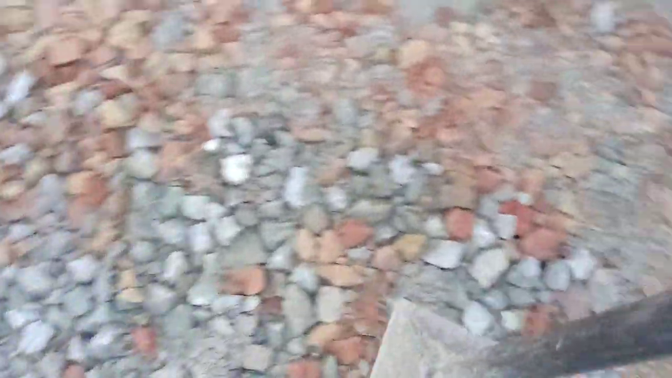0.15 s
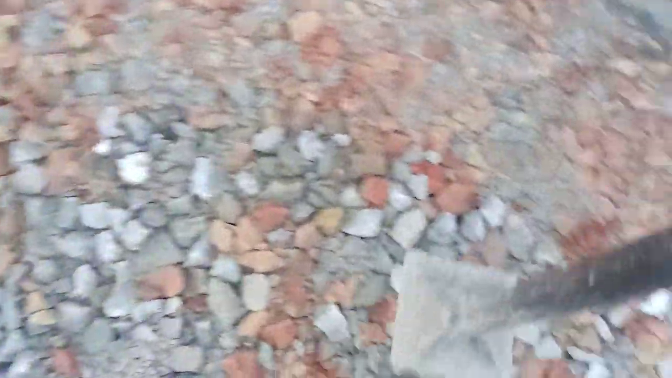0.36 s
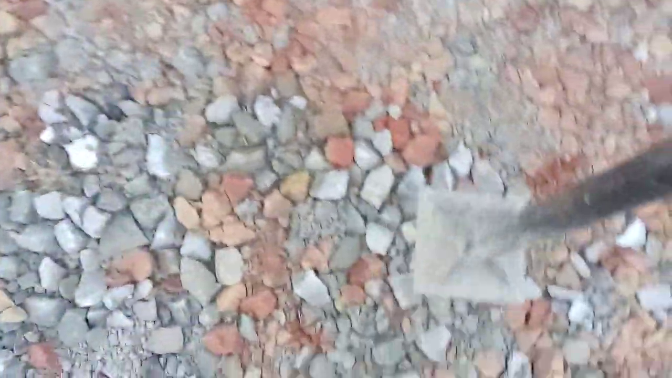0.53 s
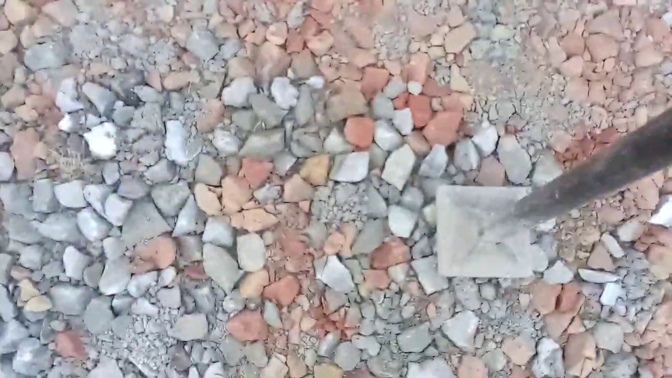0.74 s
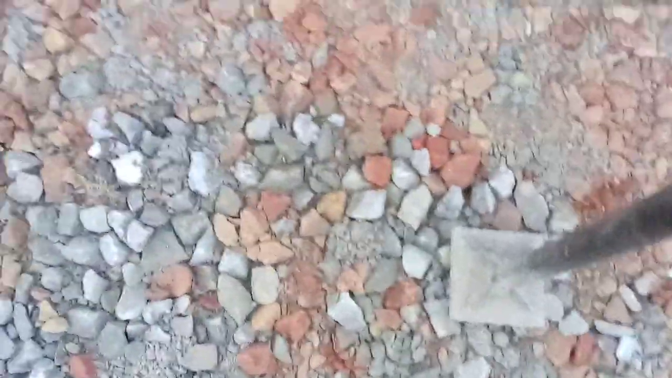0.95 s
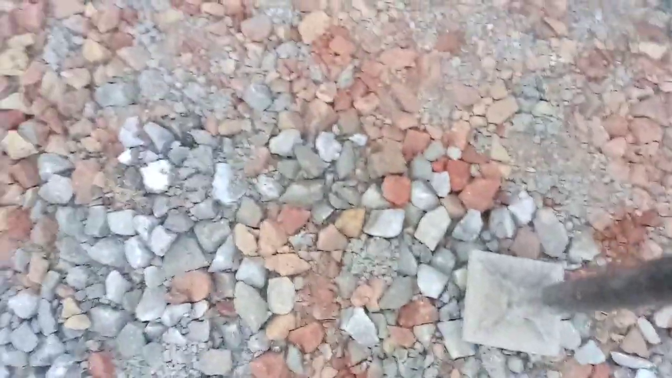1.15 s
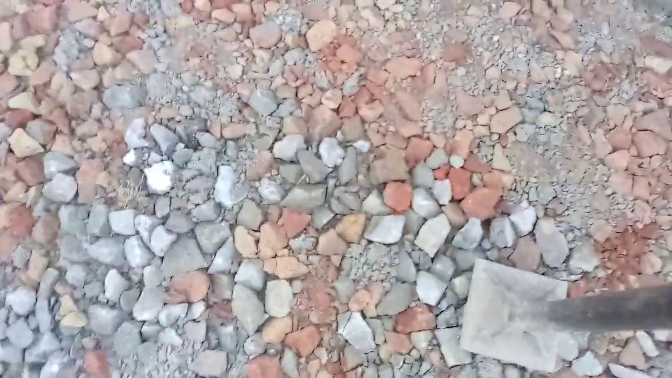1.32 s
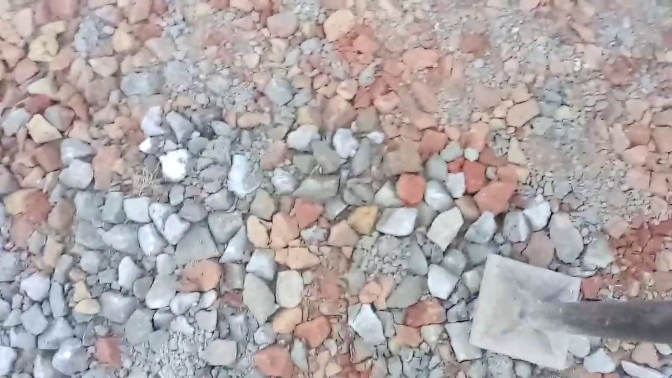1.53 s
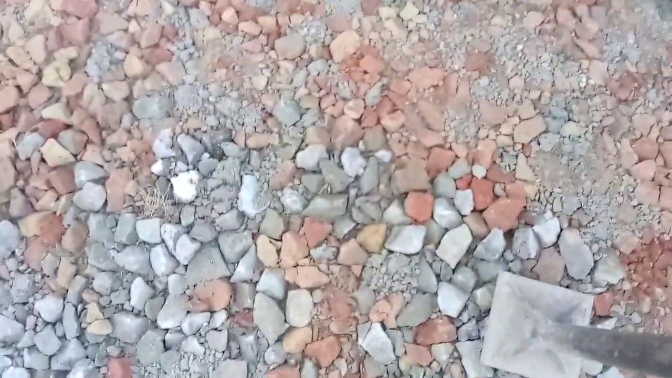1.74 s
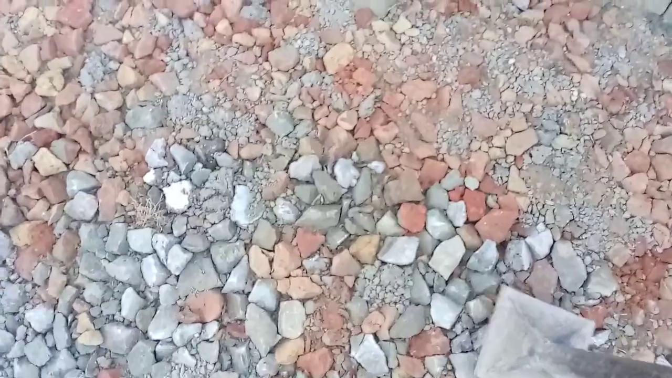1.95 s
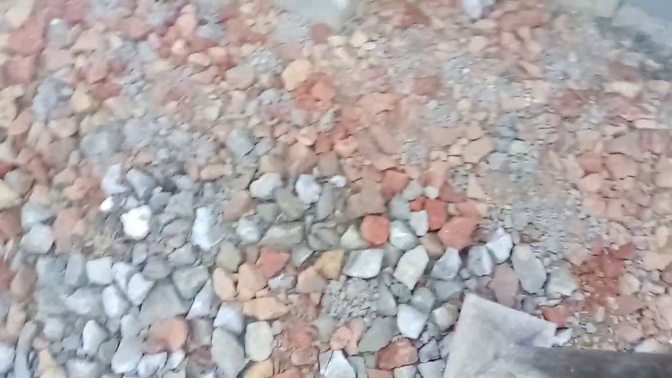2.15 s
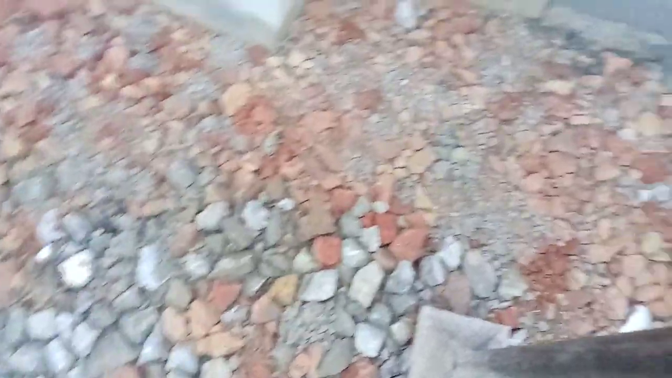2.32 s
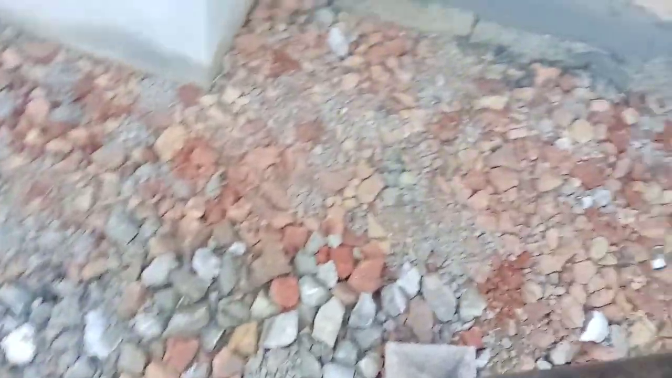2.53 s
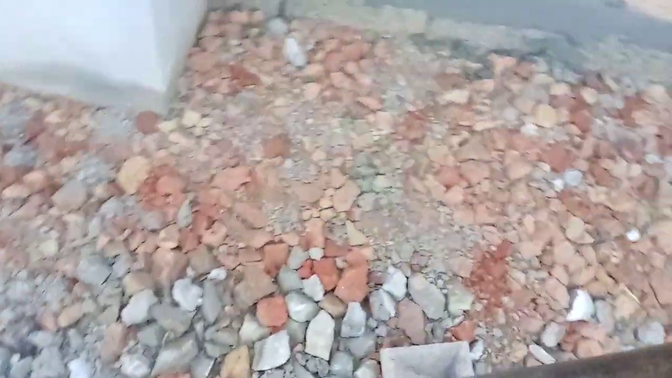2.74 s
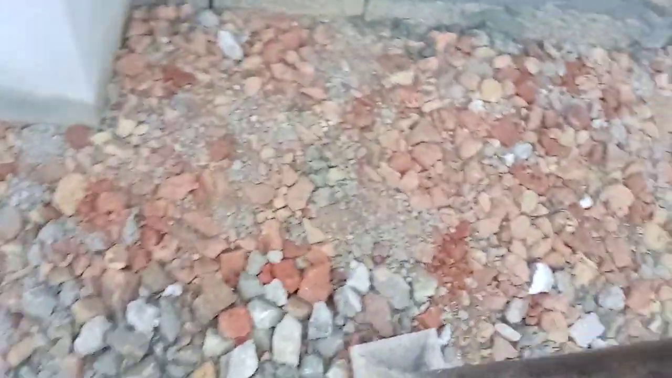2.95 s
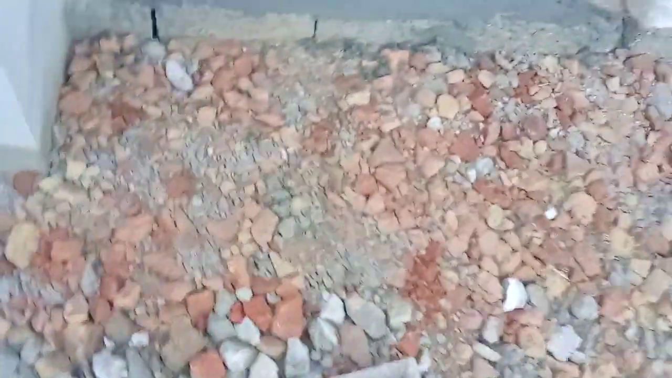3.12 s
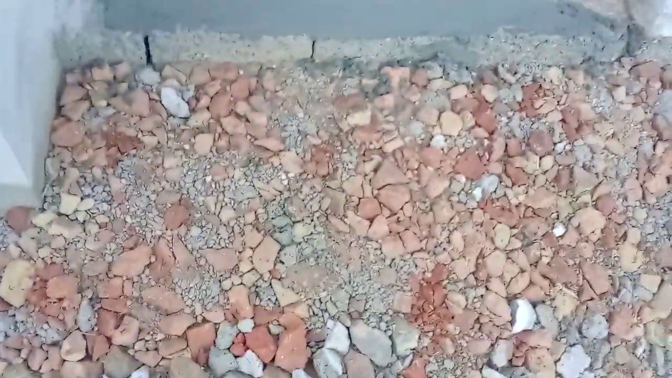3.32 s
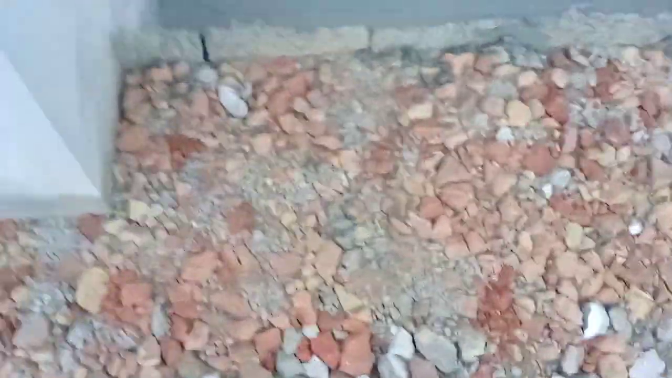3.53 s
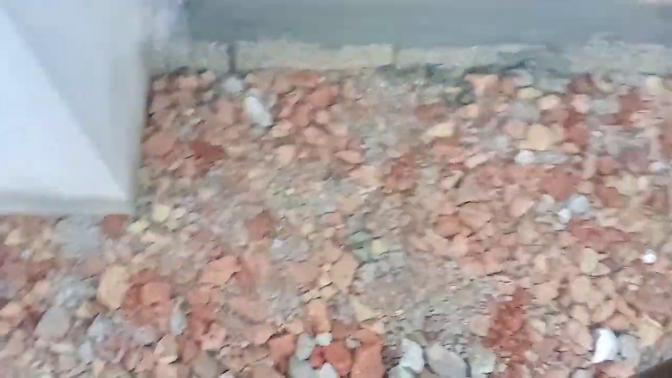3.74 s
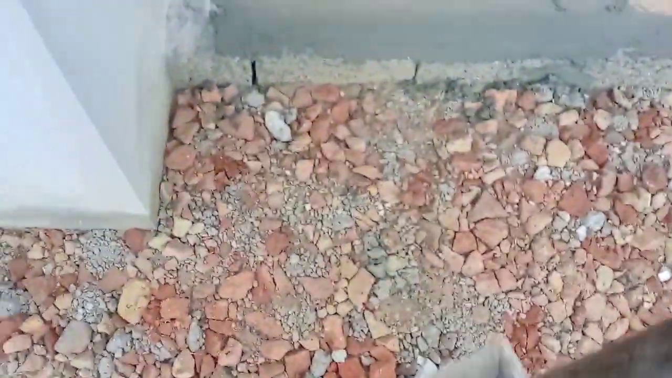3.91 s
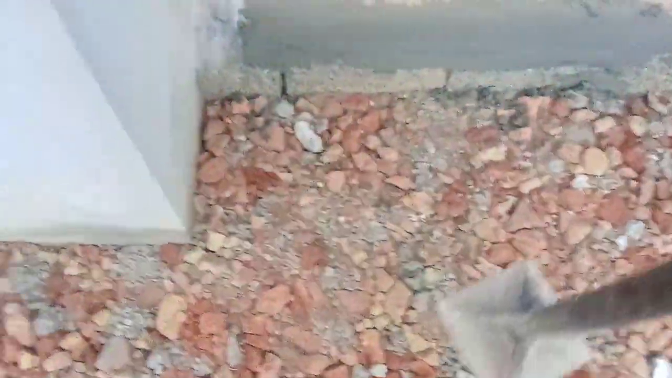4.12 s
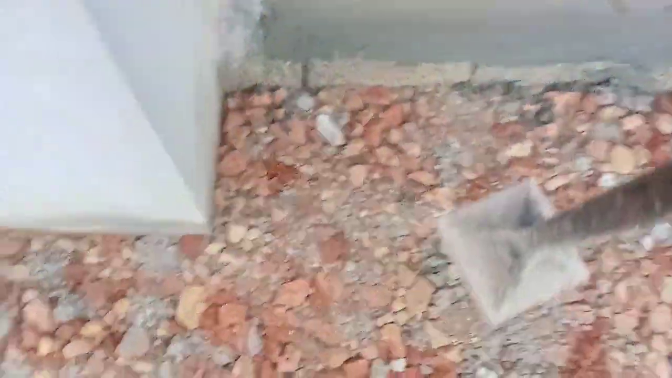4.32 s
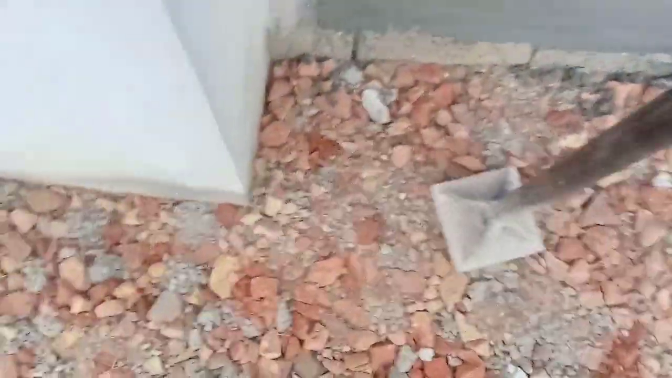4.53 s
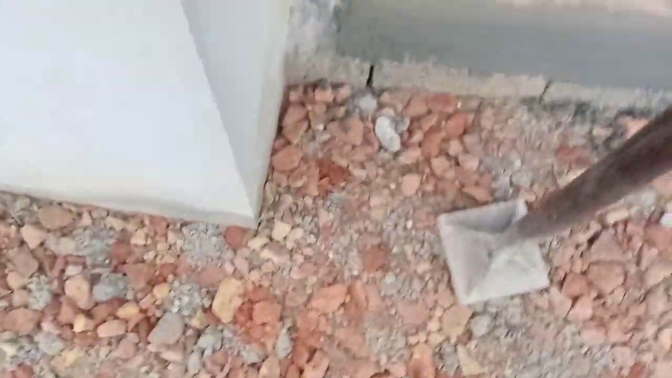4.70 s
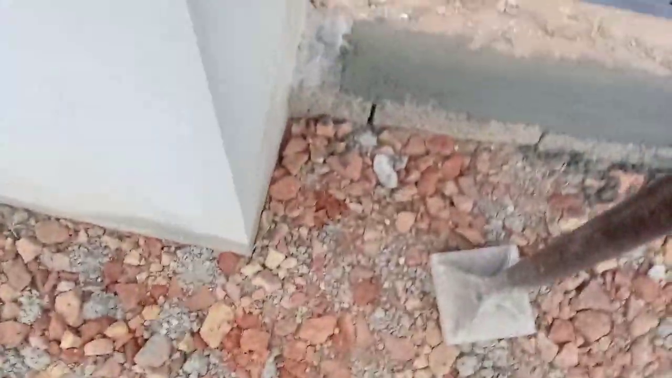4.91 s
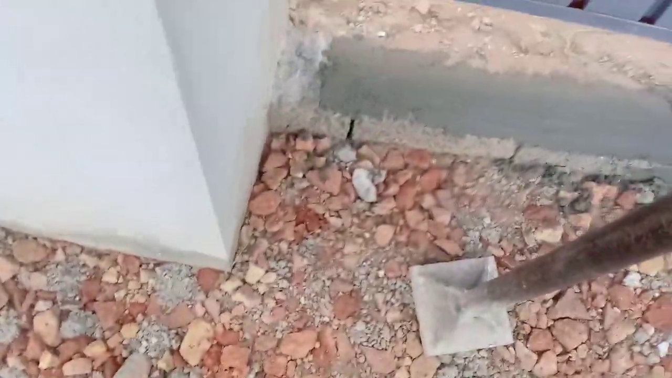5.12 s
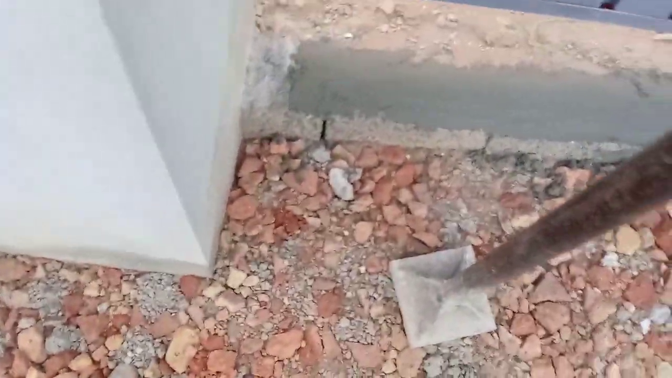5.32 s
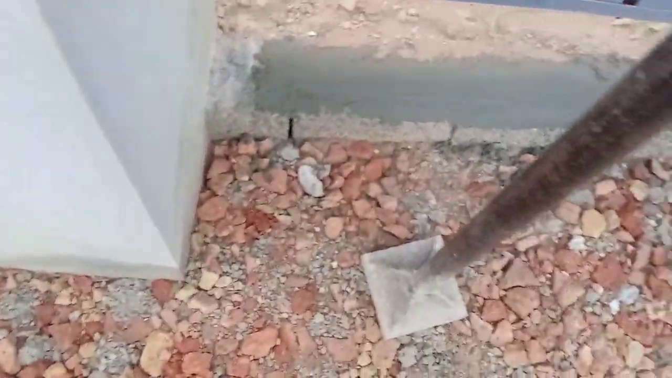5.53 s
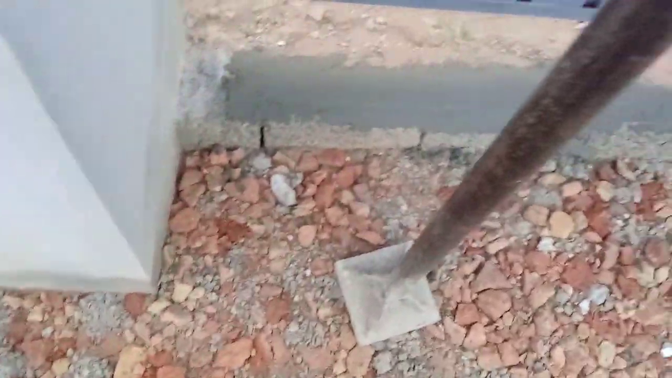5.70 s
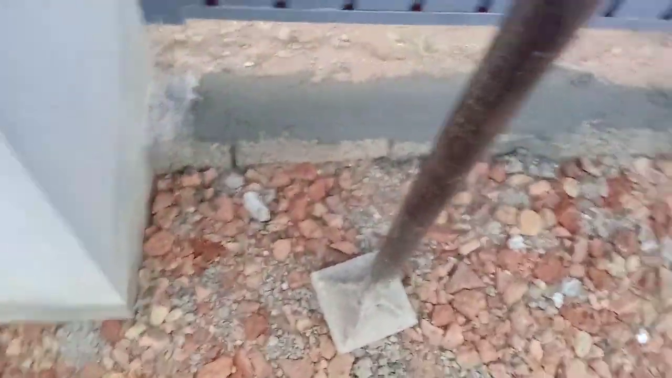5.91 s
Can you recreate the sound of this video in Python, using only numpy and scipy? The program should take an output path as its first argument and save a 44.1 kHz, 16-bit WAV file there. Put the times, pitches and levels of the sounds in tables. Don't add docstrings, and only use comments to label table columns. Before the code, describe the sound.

A steel hand tamper hits broken brick twice, a glancing clank then a hard ringing crack, with stones rattling and an engine knocking nearby.

```python
import sys
import numpy as np
from scipy import signal
from scipy.fft import rfft, irfft, next_fast_len
from scipy.io import wavfile

SR = 44100
rng = np.random.default_rng(int(sys.argv[2]) if len(sys.argv) > 2 else 0)


def nominal_scale(level):
    x = np.asarray(level, float) / 20
    return 10 ** x


def wav_out(sig):
    wavfile.write(sys.argv[1], SR, np.round(np.clip(np.atleast_2d(sig).T, -1, 1) * 32767).astype(np.int16))


N = 267318

# time in seconds, level in dB.
RUMBLE_LEVEL = [(0.0, -57.5), (0.5, -59), (1.0, -47.5), (1.5, -58.5), (1.9, -52), (2.1, -57), (2.6, -58.5),
                (3.24, -57.5), (3.5, -51.5), (4.3, -53), (4.67, -38), (4.91, -47.5), (5.3, -43),
                (5.89, -58), (6.06, -66)]
# frequency in Hz, density in dB per Hz.
RUMBLE_SPECTRUM = [(15, -68), (25, -31), (38, -39), (76, 6.5), (140, 4), (168, -11.5), (246, -24),
                   (300, -12.5), (390, -46), (660, -120)]
AIR_SPECTRUM = [(150, -20.5), (200, 3), (300, -14.5), (600, -17), (1100, -9.5), (1700, -21), (3000, -17),
                (6100, -18), (6800, -25.5), (9500, -34), (13500, -32.5), (15100, -21), (15700, -33),
                (16200, -68)]
# start in seconds, casing ring in dB, dull part in dB, bright part in dB.
FIRINGS = [(0.0707, -58.5, -56, -68), (0.1593, -56, -62, -66), (0.2475, -46.5, -51, -60),
           (0.337, -49, -42.5, -66), (0.4267, -54, -52, -52), (0.5153, -54.5, -51, -56.5),
           (1.0507, -54.5, -41, -46), (1.1392, -65, -41, -42), (1.229, -65, -55, -63),
           (1.3175, -55.5, -52, -58), (1.407, -51, -46, -50), (1.5864, -46, -49, -51),
           (1.675, -59, -40.5, -46), (1.7638, -52, -39.5, -55), (1.8528, -52, -43.5, -42),
           (2.0316, -55, -57, -52), (2.1205, -54, -40.5, -67), (2.209, -54.5, -48, -46),
           (2.2975, -62, -44, -45), (2.386, -50, -39.5, -42), (2.4755, -49, -47, -54),
           (2.5644, -52.5, -39.5, -62), (2.654, -52, -39.5, -47), (2.7424, -73, -43, -43.5),
           (2.8313, -63, -43.5, -44), (2.9204, -53, -62, -39.5), (3.009, -57.5, -39, -66),
           (3.0978, -69, -41.5, -43), (3.1867, -52.5, -49, -52), (3.2755, -53, -44, -40),
           (3.3647, -72, -64, -49), (3.453, -67, -51, -53), (3.5421, -81, -46, -44.5),
           (3.631, -77, -45, -46.5), (3.72, -66, -52, -40), (3.8087, -54, -46, -36),
           (3.9866, -50.5, -59, -37), (4.0758, -66, -42, -42), (4.1642, -46, -63, -45),
           (5.144, -67, -57, -48), (5.2323, -57, -54, -42.5), (5.3212, -54.5, -53, -61),
           (5.4105, -50, -58, -58), (5.4992, -65, -57, -54), (5.588, -79.5, -51, -65),
           (5.6772, -66, -38.5, -56), (5.7663, -76, -40, -48), (5.8551, -71, -50, -43.5),
           (5.9441, -83, -42, -66), (6.033, -67.5, -53, -49)]
# frequency in Hz, level in dB, t60 in seconds.
CASING_MODES = [(628, -15, 0.026), (875, -10.5, 0.018), (1232, -6.5, 0.17), (1266, -0.5, 0.072),
                (977, -14, 0.012), (1422, -9, 0.022), (1790, -7.5, 0.0062)]
# start in seconds, length in seconds, start and end frequency in Hz, level in dB.
CHIRPS = [(0.136, 0.094, 4660, 6200, -69), (2.78, 0.058, 3630, 3780, -78),
          (2.807, 0.037, 3930, 3470, -59.5), (3.065, 0.12, 3090, 3250, -66.5),
          (3.148, 0.067, 3520, 3560, -64), (3.353, 0.12, 3970, 4800, -62), (3.615, 0.11, 2940, 3310, -63.5),
          (3.691, 0.049, 3630, 2750, -58), (3.797, 0.038, 1640, 1300, -76), (3.889, 0.028, 4280, 4400, -62),
          (3.961, 0.0454, 3470, 4093, -58), (4, 0.035, 3590, 2940, -65), (4.956, 0.042, 3940, 4060, -66),
          (5.258, 0.084, 4150, 4840, -63.5), (4.183, 0.22, 2880, 3040, -67.5)]
# contact in seconds, plate seated in seconds, crack in dB, thud in dB, thud in Hz.
BLOWS = [
    (0.6197, 0.634, -24.5, -29, 99),
    (4.4864, 4.4917, -13.5, -16, 115.7),
]
# frequency in Hz, density in dB per Hz.
CRACK_SPECTRUM = [(88, -27.5), (150, 4.5), (270, -12.5), (466, -12), (1870, -0.5), (2140, -12.5),
                  (3100, -4), (4320, -16), (5910, 3.5), (7770, -25), (16000, -43)]
# frequency in Hz, glancing blow in dB, square blow in dB, t60 in seconds.
STEEL_MODES = [(290.6, -33.5, -39, 0.35), (1244.7, -12.5, -37, 0.52), (1341, -32, -29.5, 0.69),
               (1863, -31, -24.5, 0.43), (2449, -18.5, -30, 0.15), (2967, -37.5, -36, 0.32),
               (3058, -34, -33, 0.4), (3118, -43, -36, 0.61), (3176, -34.5, -47.5, 0.27),
               (3705, -30.5, -30, 0.32), (3872, -36.5, -32.5, 0.35), (3990, -53.5, -39, 0.15),
               (4094, -37.5, -31.5, 0.25), (4705, -49.5, -26.5, 0.53), (4930, -43.5, -33, 0.1),
               (5445, -46.5, -30.5, 0.5), (5870, -41, -22, 0.14), (6288, -39.5, -28.5, 0.062),
               (6000, -28, -30, 0.2), (6422, -49.5, -24, 0.15), (5970, -45, -32.5, 0.24),
               (5560, -40.5, -29, 0.2), (6230, -53.5, -37, 0.15), (6080, -39, -23, 0.16),
               (6067, -36.5, -20.5, 0.17), (6930, -44.5, -48, 0.45), (7220, -45.5, -44.5, 0.16),
               (7150, -50.5, -39, 0.22)]
PLATE_ROWS = [1, 4, 13, 16, 17, 18, 19, 20, 21, 22, 23, 24, 25, 26, 27]
FED_MODES = [(0, 2), (0, 3), (0, 9), (0, 10), (1, 2), (1, 7), (1, 10), (1, 11)]
# start in seconds, frequency in Hz,
# level in dB, t60 in seconds.
SINGING_MODES = [(.78, 1249, -52.5, 1.0), (.73, 2350, -37, 0.087), (1.0, 2449, -60.5, 0.39),
                 (.84, 1866, -58.5, 1.3), (1.02, 4705, -61.5, 0.23), (1.02, 3710, -65, 0.48),
                 (1.189, 4705, -67, 0.78), (1.2, 3706, -69, 1), (1.35, 5400, -58, 0.87),
                 (1.4, 4100, -66, 1.4), (1.429, 6422, -62, 0.25), (1.45, 1863, -60, 0.21),
                 (1.46, 2449, -60, 0.32), (1.56, 3881, -62.5, 0.8), (1.562, 6422, -49, 0.14),
                 (1.56, 2449, -60.5, 0.32), (2.018, 3058, -62.5, 0.45), (2.02, 6422, -56, 0.11),
                 (2.168, 4705, -65, 0.8), (2.18, 6067, -58.5, .2), (2.459, 2449, -50, 0.18),
                 (2.465, 5970, -42.5, 0.026), (2.545, 2449, -58, 0.22), (3.44, 2090, -59, 0.25),
                 (4.5, 5364, -42.5, 0.65), (4.55, 5445, -33.5, 0.36), (4.72, 1345, -49.5, 0.94),
                 (4.902, 4705, -69, 1.2), (4.982, 5445, -52, 0.22), (4.982, 3176, -58.5, 0.29),
                 (4.986, 7150, -67, .25), (4.99, 3881, -64.5, 0.53), (4.99, 6067, -61, 0.43),
                 (5.03, 1863, -59, 0.78), (5.028, 1240, -57, 0.18), (5.19, 5445, -61, 0.46),
                 (5.22, 3720, -66.5, .3), (5.379, 5445, -67, 0.82), (5.381, 1863, -61, 0.21),
                 (5.385, 4705, -68, 0.32), (5.385, 3830, -67, 0.46), (5.5, 1266, -59, .2),
                 (5.965, 1270, -69, 0.17)]
# start in seconds, frequency in Hz, level in dB, t60
# in seconds.
BUMPS = [
    (0.831, 349, -44, 0.045),
    (1.04, 560, -52, 0.11),
    (1.721, 73.2, -44.5, 0.97),
    (3.948, 300, -45, 0.039),
    (4.29, 543, -42, 0.11),
    (4.301, 300, -48.5, 0.19),
]
# start in seconds, bare
# snap in dB, ring in dB, frequency in Hz, t60 in seconds.
SHORT_CLICKS = [(.6222, -38, -41, 1500, .012), (.6278, -15, -24.5, 850, .01),
                (0.6312, -32, -17.5, 4170, 0.0059), (1.9221, -46, -41.5, 1863, .12),
                (1.9232, -60, -41.5, 3176, 0.17), (1.9433, -51, -31.5, 5910, 0.037),
                (1.9455, -60, -41, 415, 0.074), (4.4854, -22, -11, 5770, 0.021),
                (4.4927, -38, -19, 1270, 0.012), (4.4913, -41, -14.5, 6010, 0.031),
                (1.045, -55, -54, 2490, .02), (1.3834, -30, -38, 2000, 0.01), (1.386, -23, -37, 1470, 0.02),
                (1.388, -50, -52, 1300, 0.021), (3.165, -60, -48, 1395, 0.024),
                (3.1682, -55, -48, 4930, .012), (3.182, -62, -45.5, 1100, 0.033),
                (3.192, -60, -53, 3370, .012), (3.4733, -31, -38.5, 1840, 0.018),
                (3.476, -64, -47, 1243, 0.056), (3.901, -47, -36.5, 1175, 0.038),
                (3.9145, -57, -54, 1300, .04), (3.9286, -38, -43, 1650, .03),
                (3.939, -55, -49, 1250, 0.039), (3.9548, -46, -42, 1410, 0.023),
                (4.002, -70, -55, 1270, 0.07), (4.306, -57, -41.5, 527, 0.035),
                (4.323, -39, -48, 2340, 0.017), (4.4859, -25, -28, 1710, .02),
                (4.7838, -54.5, -46, 5700, .012), (5.725, -71.5, -59, 1610, 0.052)]
# start in seconds, fine grit in dB, coarse lumps in dB, t60 in seconds.
GRAVEL_SHIFTS = [(0.628, -64, -28, 0.045), (0.645, -57, -47, 0.5), (0.839, -89, -55, 0.17),
                 (1.159, -64, -63.5, 0.85), (1.372, -52, -87, 0.15), (1.87, -63, -74, 0.65),
                 (1.939, -62, -53.5, 0.29), (2.254, -54, -64, 0.076), (2.43, -67.5, -77, 0.34),
                 (2.52, -69, -77, 1.1), (3.15, -60, -61.5, 0.41), (3.36, -63.5, -72.5, 0.6),
                 (3.469, -55, -79, 0.077), (3.65, -70, -80, 0.4), (3.887, -74, -57.5, 0.36),
                 (4.07, -75, -80, 0.12), (4.2, -79, -85, 0.22), (4.283, -67, -56, 0.19),
                 (4.94, -80, -63, 0.27), (5.85, -79, -67.5, 1.13)]
# frequency in Hz, density in dB per Hz.
GRIT_SPECTRUM = [(800, -35.5), (1200, 6.5), (2000, 7.5), (3200, 2.5), (4500, 6), (5200, 2.5), (6000, -4),
                 (8000, -17.5), (12000, -37.5), (16000, -25)]
SLIDE_SPECTRUM = [(120, -55.5), (200, -18), (671, -14.5), (1000, -38), (1250, -11.5), (1550, -23.5),
                  (2300, -8.5), (3250, -4), (4950, -4), (5400, -10), (6300, -7), (6800, -26.5), (7300, -10),
                  (7800, -24.5), (9200, -35), (10900, -50), (15000, -38)]
# time in seconds, level in dB.
SPRAY_STROKE = [(.64, -70), (.66, -47), (.70, -40), (.75, -46.5), (.85, -60), (.93, -76), (1.0, -74)]
SCUFF_STROKE = [(3.88, -95), (3.897, -60.5), (3.915, -60), (3.935, -53), (3.958, -64), (3.966, -72),
                (4.02, -76)]
SLIDE_STROKE = [(4.27, -87), (4.296, -67), (4.317, -51), (4.327, -40), (4.42, -42.5), (4.46, -48.5),
                (4.478, -50), (4.484, -61)]
# frequency in Hz, width in Hz, level in dB.
SPRAY_RESONANCES = [(2350, 87, -6.5), (3060, 110, -4), (4170, 120, -10), (4920, 60, -10.5)]
SCUFF_RESONANCES = [(1220, 73, -2.5), (1647, 54, -8.5), (3290, 88, -9.5), (4090, 82, -7.5), (4960, 39, -10),
                    (5640, 62, -11), (6240, 40, -13), (6900, 48, -17)]
SLIDE_RESONANCES = [(644, 110, -5.5), (1270, 61, -7), (1820, 170, -4), (2100, 32, -7.5), (2350, 96, 1.5),
                    (3040, 25, 0), (3280, 140, 4.5), (3810, 31, -5.5), (4460, 30, -16), (4550, 130, 3),
                    (6040, 230, -18.5), (7250, 59, -23), (8290, 110, -35), (8840, 40, -35.5)]
# start in seconds, pipe, socket and plate in dB, rise in seconds.
TOUCHES = [(1.0174, -48, -68, -55, 0.0016), (1.319, -58, -57, -57, 0.027), (1.448, -42, -73, -43, 0.032),
           (1.5639, -50, -76, -39.5, 0.0006), (1.851, -59, -69, -52, .02), (1.9216, -36, -42, -46, 0.0011),
           (1.943, -34, -40, -30.5, 0.0017), (2.021, -54.5, -61, -50.5, 0.0071),
           (2.17, -69, -59, -51, .012), (2.2583, -45.5, -48, -48.5, 0.0014),
           (2.476, -47, -64, -43.5, 0.0016), (4.983, -52, -57, -47, 0.015), (5.171, -63, -72, -60.5, 0.027),
           (5.387, -66, -66, -55, 0.0024)]
# frequency in Hz, level in dB, t60 in seconds.
CRASH_BANDS = [(80.4, -60, 4), (149.3, -48, 1.5), (300, -49, 2.5), (568, -38.5, 1.83), (860, -46, 1.1),
               (1246, -48.5, 1.3), (2292, -43.5, 0.66), (4800, -53.5, 0.44), (7020, -49.5, 0.37),
               (10000, -75, .2)]
# frequency in Hz, level in dB, t60 in seconds.
YARD_MODES = [(154.8, -54, 0.22), (295.5, -54.5, 0.35), (423.4, -49.5, 0.084), (654, -58, 0.2),
              (1243, -34, 0.13)]


def rms_one(x):
    return x / np.sqrt(np.mean(x ** 2) + 1e-20)


def butterworth(x, order, hz, kind):
    return signal.sosfilt(signal.butter(order, hz, kind, fs=SR, output="sos"), x)


def in_time(rows):
    s, db = np.transpose(rows)
    return np.interp(np.arange(N) / SR, s, db, left=-200, right=-200)


def coloured(x, spectrum):
    hz, db = np.transpose(spectrum)
    size = next_fast_len(N)
    bins = np.maximum(np.fft.rfftfreq(size, 1 / SR), 1)
    gain_db = np.interp(np.log(bins), np.log(hz), db, left=-120, right=-120)
    return rms_one(irfft(rfft(x, size) * nominal_scale(gain_db), size)[:N])


def drift(rate):
    r = np.exp(-80 * np.pi * rate / SR)
    slow = signal.lfilter([1], [1, -2 * r, r * r], rng.standard_normal(N // 40 + 2002))[2000:]
    return np.interp(np.arange(N) / 40, np.arange(len(slow)), rms_one(slow))


def ring(clicks, hz, t60):
    r, w = nominal_scale(-60 / (t60 * SR)), 2 * np.pi * hz / SR
    return signal.lfilter([0, np.sin(w)], [1, -2 * r * np.cos(w), r * r], clicks + 1e-18)


def swell(start, rise, t60, size=None):
    t = np.maximum(np.arange(size or N) / SR - start, 0)
    return np.minimum(t / rise, 1) ** 2 * nominal_scale(-60 * np.maximum(t - rise, 0) / t60)


def grains(per_s, spread_db):
    sizes = nominal_scale(spread_db * np.minimum(rng.exponential(1, N), 5)) * rng.choice([-1, 1], N)
    return rms_one(sizes * (rng.random(N) < per_s / SR))


def add_mode(out, s, rise, hz, db, t60, bedding_db=0.0, hold=0.0):
    span = out[round(s * SR):][:SR]
    t = np.arange(len(span)) / SR
    held_db = 60 * np.clip(t - rise, 0, hold) / t60
    level_db = db + held_db - bedding_db * np.maximum(t - .075, 0)
    envelope = nominal_scale(level_db) * swell(0, rise, t60, size=len(span))
    span += envelope * np.sin(2 * np.pi * (hz * t + rng.random()))


def background():
    rumble = coloured(rng.standard_normal(N), RUMBLE_SPECTRUM) * nominal_scale(in_time(RUMBLE_LEVEL) + 1.9 * drift(54))
    song = ring(ring(rng.standard_normal(N), 8900, 0.0061), 8950, 0.0054)
    crickets = rms_one(song) * nominal_scale(-83.5 + 3 * drift(3.9) + 3.9 * drift(25))
    air = coloured(rng.standard_normal(N), AIR_SPECTRUM) * nominal_scale(-68.5 + 0.49 * drift(0.67))
    return rumble + crickets + air


def engine():
    at = (np.array(FIRINGS)[:, 0] * SR).astype(int)
    out, hum = np.zeros(N), nominal_scale(1.0 * drift(9.9))
    n = np.arange(600)
    knock_s, rattle_delay_s = .004, .014
    for hz, db, t60 in CASING_MODES:
        column = 2 if hz < 1100 else 1 if hz < 1330 else 3
        knock_db = np.array(FIRINGS)[:, column] + db
        blur = (1 + rng.standard_normal(600)) * np.cos(2 * np.pi * hz * n / SR)
        blur = blur * swell(0, 0.00079, 3 * knock_s, size=600)
        blur /= np.abs(blur @ np.exp(2j * np.pi * hz * n / SR))
        clicks = np.zeros(N)
        clicks[at] += nominal_scale(knock_db + 2.0 * rng.standard_normal(len(at)))
        rattle_db = knock_db - 10.0 + 2.54 * rng.standard_normal(len(at))
        clicks[at + round(rattle_delay_s * SR)] += nominal_scale(rattle_db)
        contacts = signal.fftconvolve(clicks, blur)[:N]
        out += ring(contacts + nominal_scale(db - 96.0) * rng.standard_normal(N) * hum, hz, t60)
    return butterworth(out, 4, [480, 2350], "band")


def walls(x):
    out = np.zeros(N)
    for lag_s, db in [(.0043, -21.5), (.011, -11), (.023, -15.5), (.047, -19)]:
        lag = round(lag_s * SR)
        out[lag:] += nominal_scale(db) * x[:-lag]
    return signal.lfilter([.5], [1, -.5], out)


def sparrows():
    out, flutter = np.zeros(N), nominal_scale(3.2 * drift(70)) * (1 + .4 * drift(150))
    flock = []
    for a, b, c, d in rng.random((110, 4)):
        low_hz = 2700 + 2500 * c
        flock.append((2.45 + 1.8 * a, .04 + .09 * b, low_hz, low_hz + 900 * (b - .5), -78.5 + 5 * d))
    wobble_hz, arch_hz = 60 * drift(120), 122
    for s, length, start_hz, end_hz, db in CHIRPS + flock:
        u = np.linspace(0, 1, round(length * SR))
        start = round(s * SR)
        hz = start_hz + (end_hz - start_hz) * u + arch_hz * np.sin(np.pi * u) + wobble_hz[start:][:len(u)]
        out[start:][:len(u)] += nominal_scale(db) * np.sin(np.pi * u) ** .5 * np.sin(2 * np.pi * np.cumsum(hz) / SR)
    calls = out * flutter
    tail = rng.standard_normal(SR // 4) * swell(0, 0.0019, .22, size=SR // 4)
    return calls + nominal_scale(-3) * signal.fftconvolve(calls, tail / np.linalg.norm(tail))[:N]


def blow_noise():
    out, crack = np.zeros(N), coloured(grains(8200, 0.99), CRACK_SPECTRUM)
    whistle = rms_one(butterworth(crack, 4, [14700, 15500], "band"))
    wash = butterworth(crack[::-1], 4, 6500, "low")
    dust = rms_one(butterworth(crack, 4, [7000, 11000], "band"))
    for s, seated, crack_db, thud_db, thud_hz in BLOWS:
        rise = seated - s
        out += nominal_scale(crack_db) * np.sqrt(swell(s, rise, 0.047 / 2)) * crack
        out += nominal_scale(crack_db - 19.5) * swell(s, 0.014, 0.079) * wash
        out += nominal_scale(crack_db - 28) * swell(s, rise, .13) * dust
        out += nominal_scale(-47) * swell(s, rise, .12) * whistle
        add_mode(out, seated - .007, 0.0072, thud_hz, thud_db, 0.1)
        add_mode(out, seated - .002, 0.0031, 1.5 * thud_hz, thud_db - 2.5, 0.022)
    return out


def struck_steel():
    out = np.zeros(N)
    for k, (s, seated, *_) in enumerate(BLOWS):
        for m, (hz, glancing_db, square_db, t60) in enumerate(STEEL_MODES):
            rise = 0.0076 * (1244 / max(hz, 1244)) ** .12
            bedded = k == 1 and 1500 < hz < 5000
            add_mode(out, max(s, seated - .007), rise, hz, square_db if k else glancing_db,
                     t60 * (0.78 if bedded else 1), bedding_db=280.0 * (m in PLATE_ROWS),
                     hold=0.055 * ((k, m) in FED_MODES))
    return out


def singing_and_bumps():
    halves = np.zeros((2, N))
    for k, (s, hz, db, t60) in enumerate(SINGING_MODES + BUMPS):
        add_mode(halves[k % 2], s, 0.016, hz, db, t60)
    return sum(half * nominal_scale(3 * drift(18)) for half in halves)


def short_clicks():
    out, snaps = np.zeros(N), np.zeros(N)
    for s, snap_db, db, hz, t60 in SHORT_CLICKS:
        snaps[round(s * SR)] += nominal_scale(snap_db + 12.0)
        add_mode(out, s, 0.00057, hz, db, t60)
        add_mode(out, s, 0.00044, 1.4 * hz, db - 13.5, t60)
    return out + butterworth(snaps, 4, [1300, 7000], "band")


def rasp(stroke, colour, resonances, ring_db):
    dust = grains(9000, 0.87)
    body = np.zeros(N)
    for hz, width, db in resonances:
        t60 = 1.4 / width
        body += nominal_scale(db) * rms_one(ring(ring(dust, hz, t60), hz, t60))
    return (coloured(dust, colour) + nominal_scale(ring_db) * rms_one(body)) * nominal_scale(in_time(stroke) + 1.4 * drift(40))


def gravel():
    settling = np.array([swell(s, 0.043 * t60, t60) for s, _, _, t60 in GRAVEL_SHIFTS])
    shuffle_db = -76.5
    fine, coarse = nominal_scale(shuffle_db) + nominal_scale(np.array(GRAVEL_SHIFTS)[:, 1:3]).T @ settling
    dust, edges = coloured(grains(5000, 2.6), GRIT_SPECTRUM), 800 * 2 ** np.arange(0, 4.4, .33)
    grit = np.zeros(N)
    for low, high in zip(edges, edges[1:]):
        grit += butterworth(dust, 2, [low, high], "band") * nominal_scale(1.2 * drift(14))
    lumps = butterworth(grains(2100, 3.6), 2, [280, 820], "band")
    out = fine * rms_one(grit) * nominal_scale(1.0 * drift(38)) + coarse * rms_one(lumps)
    out += rasp(SPRAY_STROKE, GRIT_SPECTRUM, SPRAY_RESONANCES, ring_db=-4.0)
    out += rasp(SCUFF_STROKE, GRIT_SPECTRUM, SCUFF_RESONANCES, ring_db=6.5)
    return out + rasp(SLIDE_STROKE, SLIDE_SPECTRUM, SLIDE_RESONANCES, ring_db=2.0)


def touches():
    brush_s, held, spread_db, weld_loss_db = .022, .6, 4.0, 2.5
    out, t = np.zeros(N), np.arange(SR // 2) / SR
    hz, _, _, t60 = np.transpose(STEEL_MODES[1:])
    modes = nominal_scale(-60 * t / np.minimum(held * t60[:, None], .15)) * np.sin(2 * np.pi * hz[:, None] * t)
    part = np.searchsorted([2200, 3450, 5600], hz)
    brush_t = t[:2000]
    for s, pipe_db, socket_db, plate_db, rise in TOUCHES:
        noise, luck = rng.standard_normal(2000), rng.standard_normal(len(hz))
        shape = np.exp(-np.maximum(brush_t - rise, 0) / brush_s) * np.minimum(brush_t / rise, 1)
        shape = shape / np.sqrt(brush_s * SR / 2)
        shared_db = (pipe_db + socket_db) / 2 - weld_loss_db
        parts_db = np.array([pipe_db, shared_db, socket_db, plate_db])
        body = nominal_scale(parts_db[part] - 12.0 - 1.3 * (hz > 6500) + spread_db * luck) @ modes
        body[:2] += nominal_scale(plate_db + 8.0) * np.array([1, -.4])
        span = out[round(s * SR):][:len(t)]
        span += signal.fftconvolve(shape * noise, body)[:len(span)]
    return out


def crash():
    start, rise_s = round(4.5 * SR), 0.095
    size = N - start
    out, white = np.zeros(N), rng.standard_normal((2, N // 3))[:, :size]
    edges = 60 * 2 ** np.arange(0, 7.3, .5)
    hz, db, t60 = np.transpose(CRASH_BANDS)
    for k, (low, high) in enumerate(zip(edges, edges[1:])):
        band = rms_one(butterworth(white[k % 2], 2, [low, high], "band"))
        centre = np.log(low * high) / 2
        level_db = np.interp(centre, np.log(hz), db) + 1.2 * drift(2.2)[start:]
        dying = swell(0, rise_s, np.interp(centre, np.log(hz), t60) / 2, size=size)
        out[start:] += nominal_scale(level_db) * np.sqrt(dying) * band
    out = butterworth(out, 4, 7000, "low")
    for mode_hz, mode_db, mode_t60 in YARD_MODES:
        out += nominal_scale(mode_db) * ring(out, mode_hz, mode_t60)
    return out


def microphone(x):
    x = butterworth(x, 4, 62, "high")
    body = signal.sosfilt(signal.cheby2(6, 30, 7700, fs=SR, output="sos"), x) + nominal_scale(-36.0) * x
    return body + nominal_scale(-9.5) * ring(x, 15100, 0.0029) + nominal_scale(-17.0) * ring(x, 12000, 0.0033)


def ducking():
    return nominal_scale(sum(-depth_db * swell(row[0], 0.016, 3.4) for row, depth_db in zip(BLOWS, [3.0, 6.0])))


def scene():
    clicks = engine() + touches()
    near = microphone(short_clicks() + clicks + walls(clicks) + gravel() + crash())
    tamper = butterworth(blow_noise() + struck_steel() + singing_and_bumps(), 2, 60, "high")
    return (near + tamper + sparrows() + ducking() * background())[None]


def top_cut(x):
    return signal.sosfilt(signal.butter(12, 16660, fs=SR, output="sos"), x)


def record(dry):
    mix = signal.sosfilt(signal.cheby2(10, 50, 16400, fs=SR, output="sos"), dry)
    return top_cut(mix)


dry = scene()
out = record(dry)
wav_out(out)
```